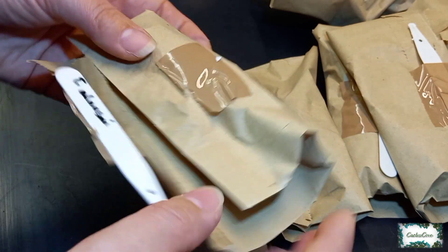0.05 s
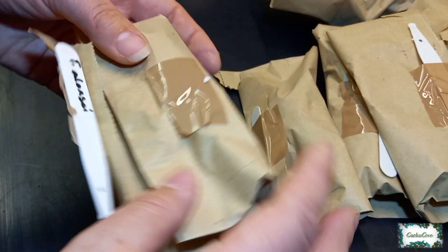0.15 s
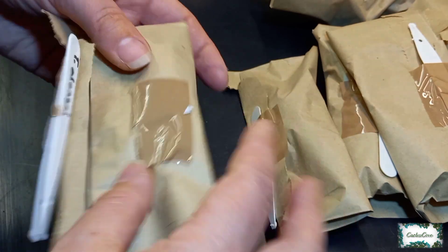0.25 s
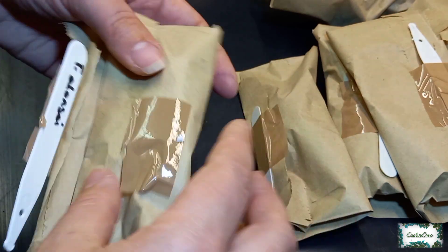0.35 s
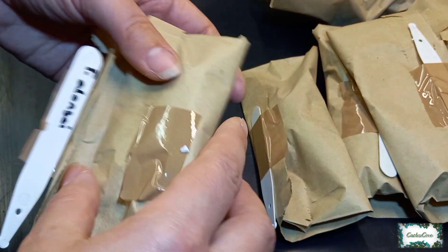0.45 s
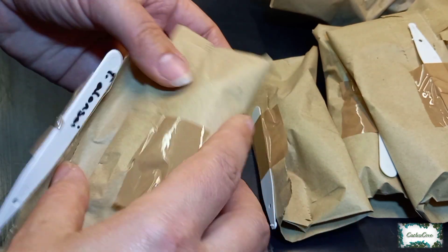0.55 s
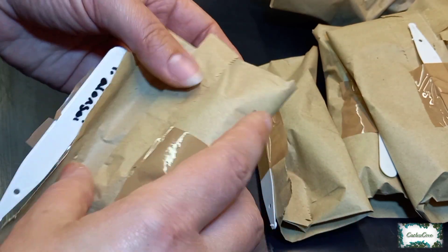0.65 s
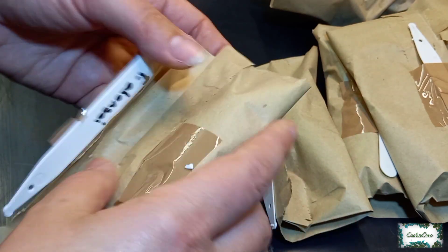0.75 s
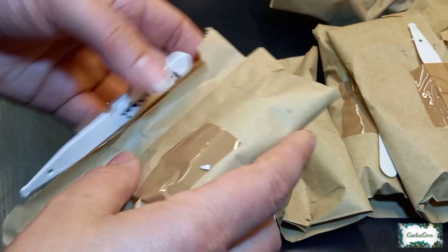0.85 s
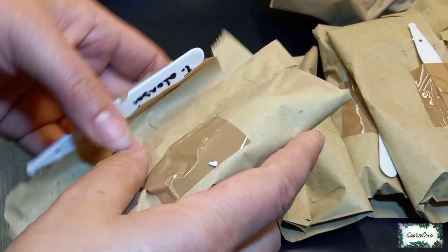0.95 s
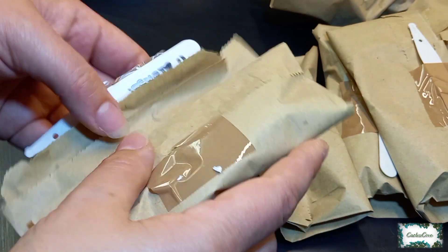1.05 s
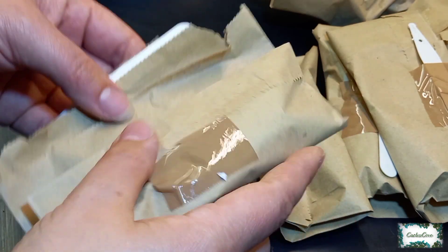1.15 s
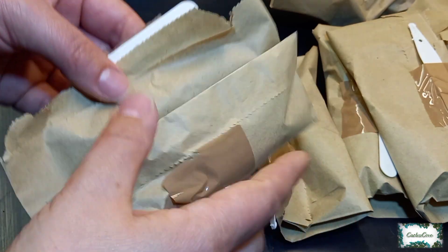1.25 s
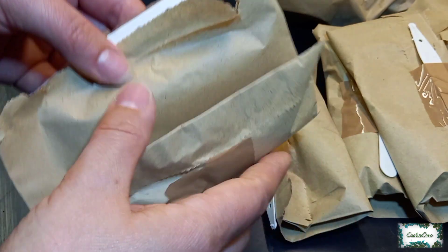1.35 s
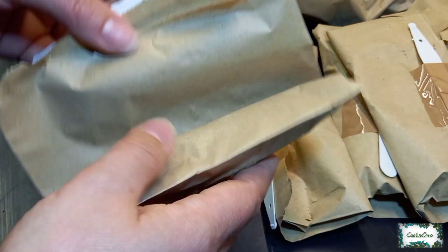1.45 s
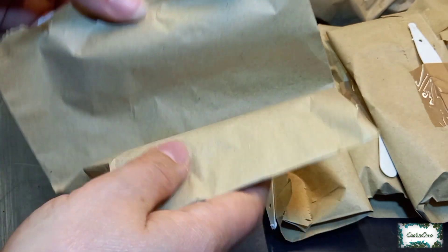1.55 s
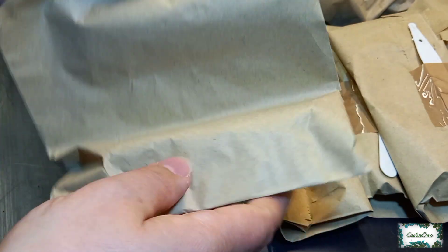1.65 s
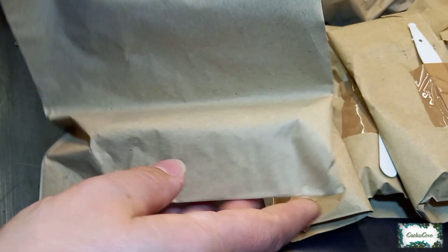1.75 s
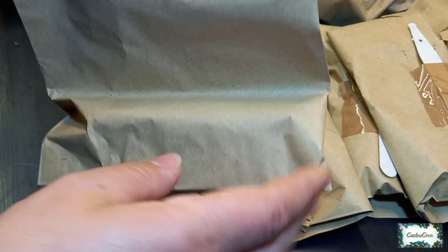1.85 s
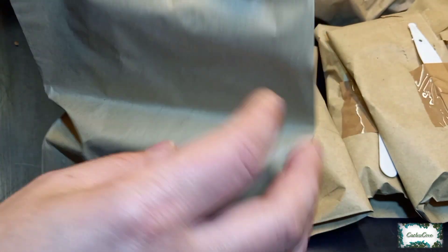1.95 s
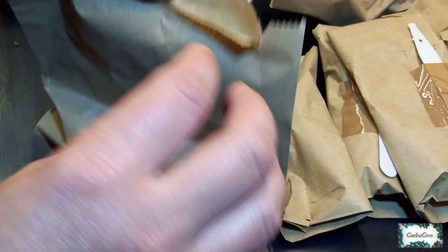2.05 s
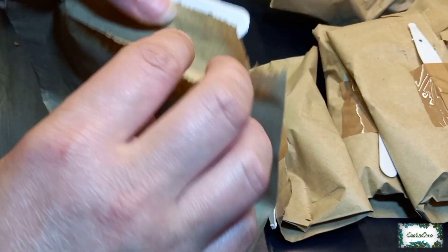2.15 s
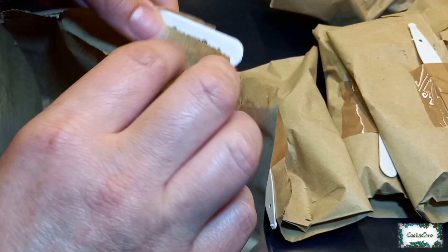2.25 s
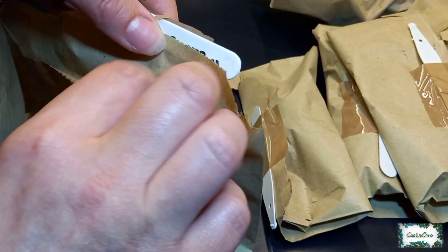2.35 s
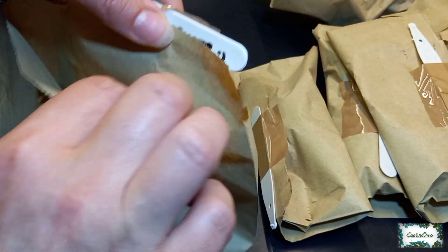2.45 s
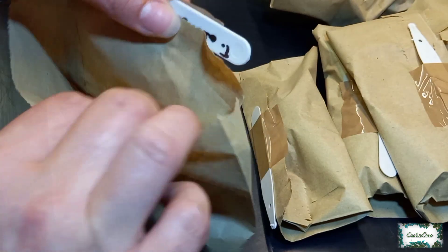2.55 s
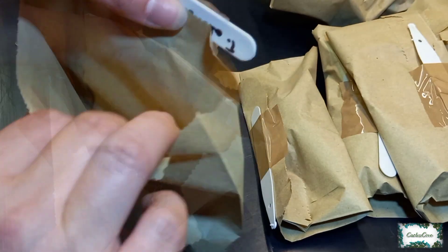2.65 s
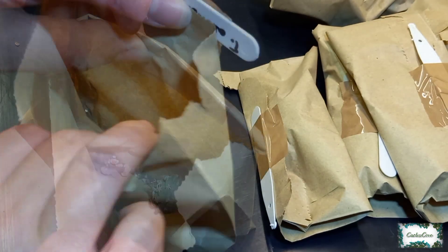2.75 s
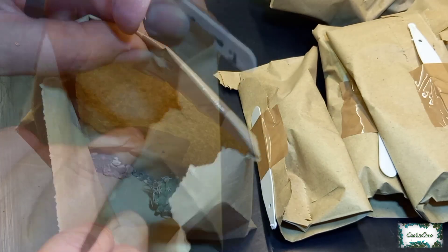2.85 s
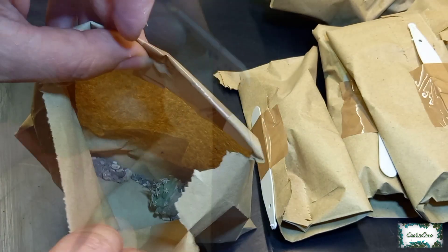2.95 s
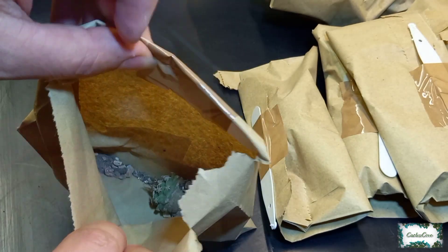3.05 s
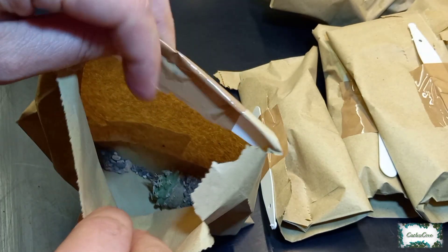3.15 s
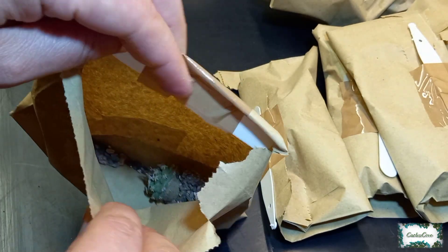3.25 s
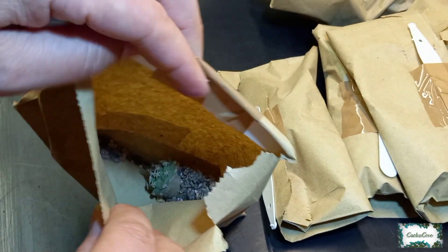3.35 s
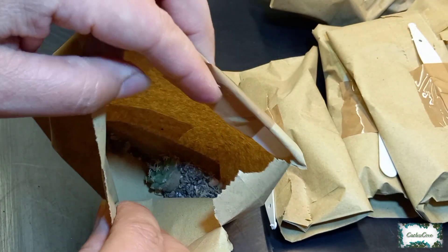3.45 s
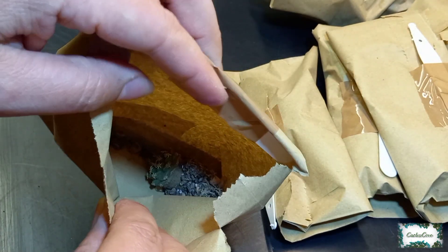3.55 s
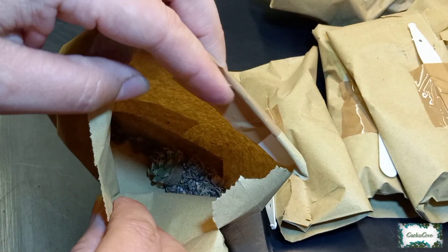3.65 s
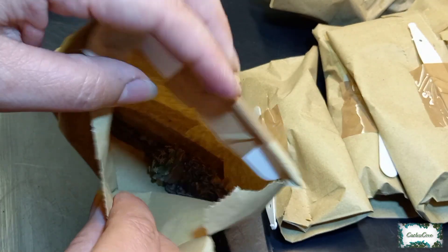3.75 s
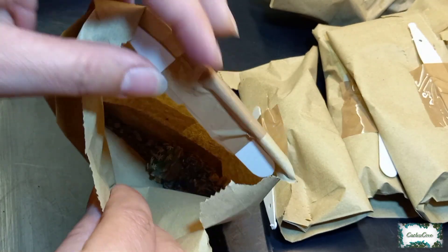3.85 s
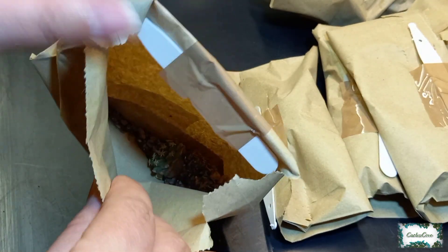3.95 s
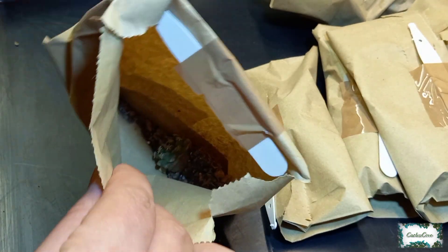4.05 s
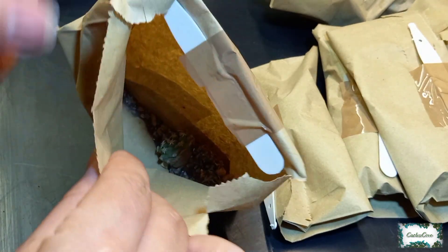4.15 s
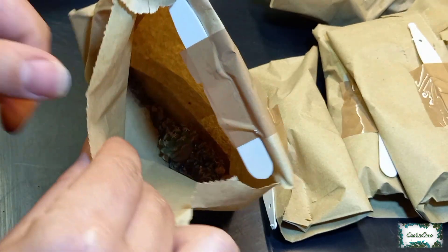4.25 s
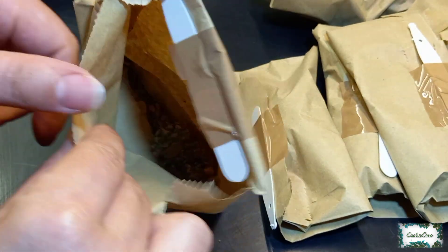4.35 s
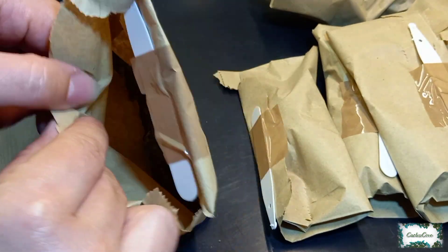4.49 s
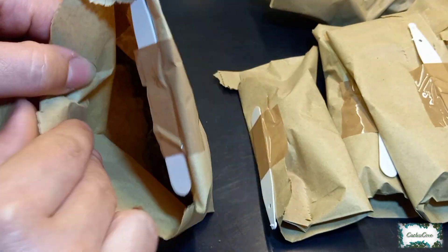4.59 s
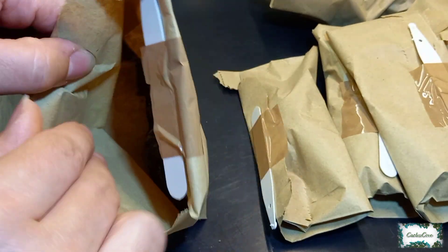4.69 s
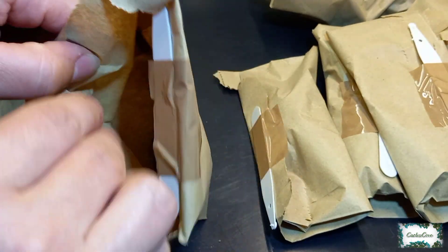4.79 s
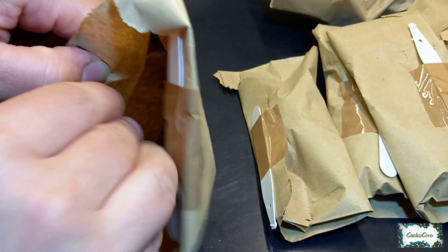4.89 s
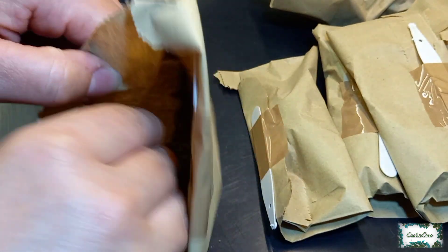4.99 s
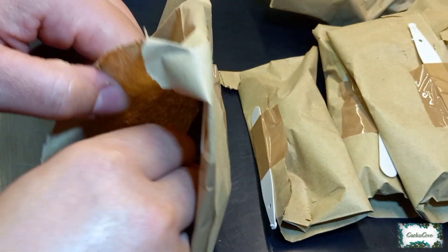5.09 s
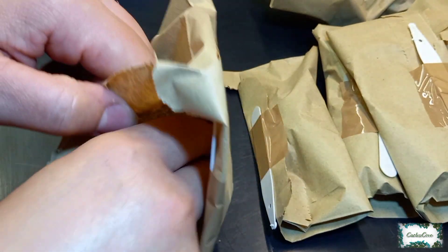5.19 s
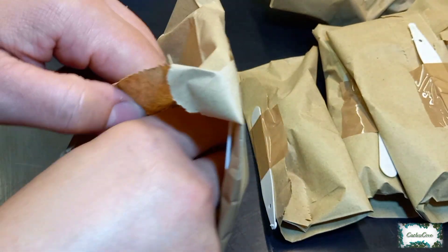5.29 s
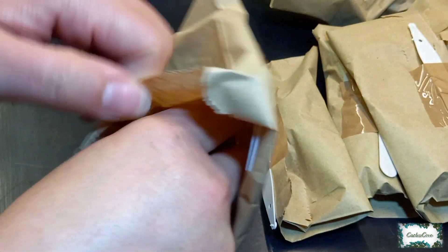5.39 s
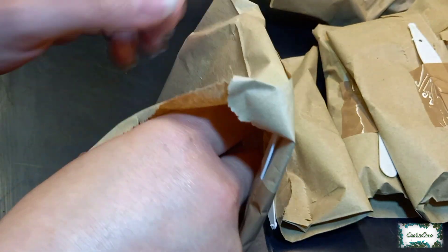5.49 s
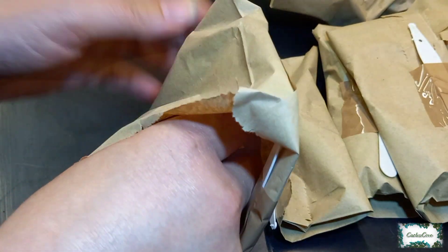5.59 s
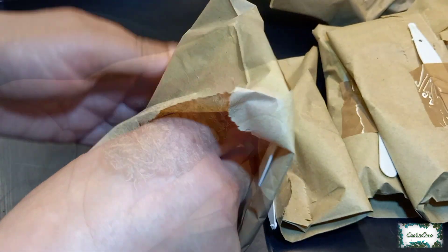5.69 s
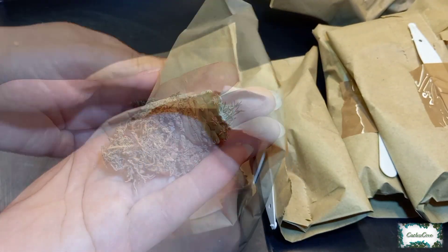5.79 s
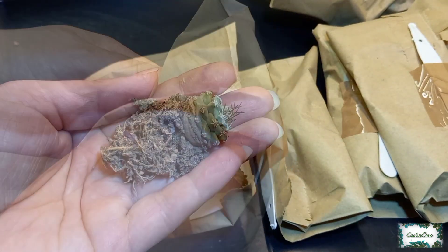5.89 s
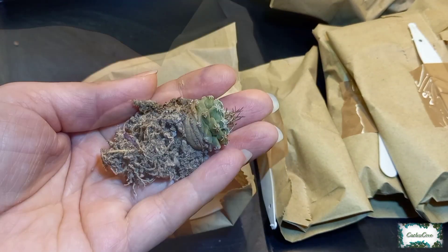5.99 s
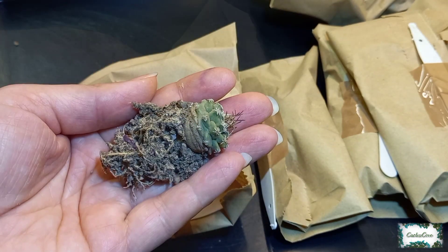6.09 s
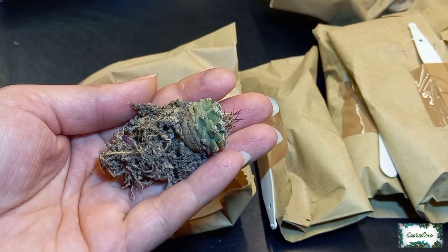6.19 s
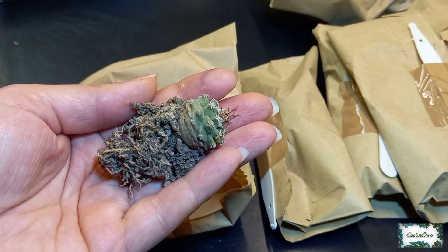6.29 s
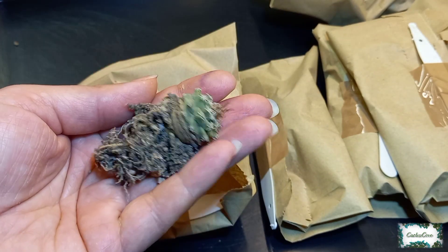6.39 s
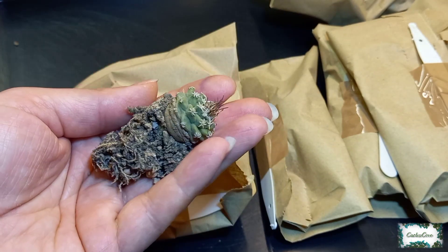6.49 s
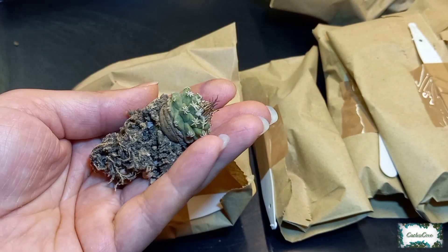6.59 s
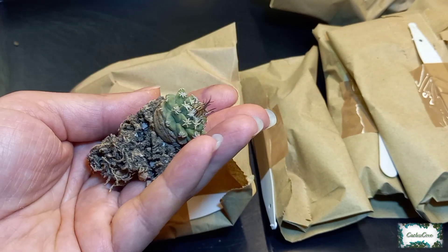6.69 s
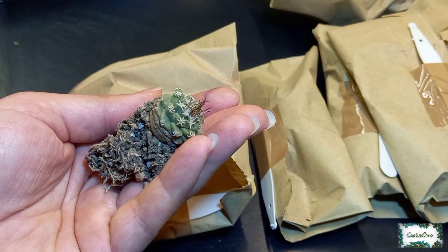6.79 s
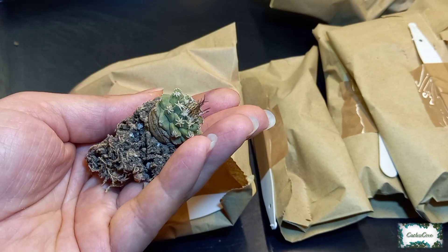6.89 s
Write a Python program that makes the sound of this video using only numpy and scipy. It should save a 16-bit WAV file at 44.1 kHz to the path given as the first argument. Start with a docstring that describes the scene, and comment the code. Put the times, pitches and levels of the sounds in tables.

```python
"""Handling a paper bag

Hands unfold a brown paper bag close by, pull it open, reach in and lift out a small cactus.
Creases buckle in swarms of tiny clicks and in single snaps, exciting the sheet and hollow of the bag.
Skin rubs narrow resonances, taut paper squeaks and the bag bumps softly; walls reflect the paper sound.
A quiet room adds noise, mains hum and a low drone that swells, fades and sinks within 1.4 s."""
import sys
import numpy as np
from scipy import signal
from scipy.fft import rfft, irfft
from scipy.io import wavfile
from scipy.ndimage import uniform_filter1d

SR = 44100
rng = np.random.default_rng(int(sys.argv[2]) if len(sys.argv) > 2 else 0)


def materialize(psi):
    """Save the field psi as 16-bit PCM at rate SR to the path in sys.argv[1].

    A 1-D psi becomes a single channel; in a 2-D psi each row is a channel.
    """
    bounded = np.clip(np.atleast_2d(psi).T, -1, 1)
    quanta = np.round(bounded * 32767).astype(np.int16)
    wavfile.write(sys.argv[1], SR, quanta)


N = 305613
TIME = np.arange(N) / SR
LEAD = 32  # samples by which every facet burst is delayed

# relative spectrum of the flexing sheet: frequency_hz, level_db
SHEET_COLOUR = [(800, -33.5), (1400, -6), (1800, -1.5), (2500, 0), (3200, -3.5), (4200, -4), (5200, -6.5),
                (8000, -29.5)]
# relative spectrum of the air in the bag: frequency_hz, level_db
HOLLOW_COLOUR = [(200, -19.5), (400, -13.5), (520, -6), (650, -1), (820, 0), (1030, 0.5), (1300, -5.5),
                 (1700, -8), (3000, -57)]
# relative spectrum of the bag's low rumble: frequency_hz, level_db
RUMBLE_COLOUR = [(35, -26), (70, 2.5), (130, -2), (250, -0.5), (370, -1.5), (550, -11.5), (1200, -54.5)]
# resonances of the bag: frequency_hz, width_hz, lift_db
BAG_MODES = [(533, 70, 8.5), (1050, 170, 7), (1647, 90, 5.5), (2150, 260, 0), (2600, 540, 1.5)]


def amp(db):
    """Level in decibels is twenty times the logarithm of amplitude."""
    return 10 ** (np.asarray(db) / 20)


def unit(x):
    """Normalization by root mean square gives unit mean power."""
    return x / np.sqrt(np.mean(x ** 2) + 1e-20)


def read(points, hz):
    """Linear interpolation along a logarithmic frequency axis."""
    f, value = np.transpose(points)
    return np.interp(np.log(hz + 1), np.log(f), value)


def add(mix, s, sound):
    """Superposition: adds a sound in place from time s, or from zero if s is negative."""
    part = mix[..., max(round(s * SR), 0):][..., :sound.shape[-1]]
    part += sound[..., :part.shape[-1]]


def through(x, taps):
    """Linear filtering is convolution with an impulse response."""
    return signal.oaconvolve(x, taps, axes=1)[:, :N]


def colour(spectrum, modes=(), size=4096):
    """Minimum phase: log magnitude fixes a causal response, here with resonances and unit energy."""
    hz = abs(np.fft.fftfreq(size, 1 / SR))
    db = read(spectrum, hz)
    for f, width, lift in modes:
        db = db + lift / (1 + (2 * (hz - f) / width) ** 2)
    response = np.exp(np.conj(signal.hilbert(np.log(amp(db)))))
    taps = np.fft.ifft(response).real[:size // 2]
    return taps[None] / np.linalg.norm(taps)


def partly_alike(first, second, same):
    """Coherence: mixes independent spectra at constant expected power, keeping a share of the first."""
    return same * first + np.sqrt(1 - same ** 2) * second


def background():
    """Stationary noise partly coherent between sides, with sinusoidal hum and a sinking drone."""
    # relative spectrum of room noise and hiss: frequency_hz, level_db (per Hz)
    floor_colour = [(20, -36.5), (45, 5), (110, 3.5), (250, -6), (500, -11), (1200, -20), (3000, -27),
                    (7300, -32.5), (7900, -25), (8250, -8.5), (8600, -24), (9500, -31), (16000, -27)]
    # coherence of the noise at the two ports: frequency_hz, likeness_0_to_1
    floor_likeness = [(25, .4), (60, .8), (300, 0.3), (1500, .2), (8000, 0.091)]
    # mains hum: frequency_hz, rms_level_db
    hum_tones = [(49.5, -86.5), (99.5, -84), (149, -88.5)]
    noise_rms_db = -74
    drone_hz, drone_sag_hz_per_s2 = 72.8, 6.55
    peak_s, peak_rms_db, slope_db_per_s = .11, -53, 59.5
    tail_rms_db, drone_end_s = -72.5, 1.4

    hz = np.fft.rfftfreq(N, 1 / SR)
    left, other = rfft(rng.standard_normal((2, N)))
    same = np.clip(read(floor_likeness, hz), 0, 1)
    right = partly_alike(left, other, same)
    noise = unit(irfft(np.array([left, right]) * amp(read(floor_colour, hz)), N))

    hum = sum(amp(db) * np.sin(2 * np.pi * (f * TIME + rng.random())) for f, db in hum_tones)

    swell = amp(peak_rms_db - slope_db_per_s * abs(TIME - peak_s))
    tail = amp(tail_rms_db) * np.sqrt(np.maximum(1 - (TIME / drone_end_s) ** 2, 0))
    pitch = drone_hz - drone_sag_hz_per_s2 * np.minimum(TIME, drone_end_s) ** 2
    drone = np.maximum(swell, tail) * np.sin(2 * np.pi * np.cumsum(pitch) / SR)
    # a sine's peak is sqrt(2) times its rms
    return amp(noise_rms_db) * noise + np.sqrt(2) * (hum + drone)


def handling():
    """Forcing envelopes: each stroke grips, swells or eases, then settles; stroke powers add."""
    # one push or pull of the hands; a negative start begins at zero, swell_db is the change over the
    # stroke, and the last two are relative to the crackle:
    # start_s, length_s, crackle_db, swell_db, sheet_db, hollow_db
    strokes = [(-0.008, 0.11, -63, 1, -12, -14.5), (0.123, 0.15, -70.5, -0.5, -1.5, -13),
               (0.322, 0.12, -64, 5, -9.5, -14), (0.416, 0.22, -60, -6.5, 1.5, -15.5),
               (0.548, 0.22, -54.5, 3, -1.5, -19), (0.782, 0.088, -57.5, 17, 1, -13.5),
               (1.002, 0.044, -67, 6, -2, -5.5), (1.077, 0.11, -51, 8.5, -2, -13),
               (1.244, 0.34, -52.5, 2, 0.5, -11), (1.468, 0.26, -46, -10, 1, -9.5),
               (1.701, 0.29, -52, 1.5, 1.5, -7.5), (2.022, 0.21, -49.5, -1.5, 0.5, -13),
               (2.247, 0.25, -55, 2, -2.5, -9.5), (2.439, 0.028, -44, 4, -2.5, -11),
               (2.535, 0.08, -47, 0, -2, -13.5), (2.624, 0.19, -49, 10, 0, -5),
               (2.857, 0.2, -47.5, -7.5, 0.5, -9), (3.086, 0.14, -53, 8.5, -1.5, -11),
               (3.239, 0.11, -49, -5, 4.5, -2.5), (3.404, 0.14, -55.5, 17, -8, -19),
               (3.568, 0.2, -56.5, 8.5, -1, -11), (3.75, 0.16, -48, 2.5, -2.5, -16.5),
               (4.01, 0.2, -73, 5, -6.5, -9.5), (4.192, 0.069, -59, -6, -5, -8.5),
               (4.264, 0.3, -64, 14, -10.5, -17), (4.465, 0.21, -48.5, 13, -3, -13.5),
               (4.64, 0.14, -56, 18, 0, -11), (4.91, 0.18, -72, 34, -10.5, -11.5),
               (5.077, 0.22, -45, 4, 0, -13), (5.325, 0.19, -43.5, -0.5, -0.5, -8),
               (5.59, 0.079, -60.5, 6, 2, -3.5), (5.68, 0.41, -62.5, 3, -5.5, -9.5),
               (5.934, 0.22, -57, 4, 0.5, -12.5), (6.15, 0.2, -67, -17, 1.5, -3.5)]
    grip_s, settle_db_per_s = .035, 181.5
    fade_start_s, fade_end_s = 6.32, 6.38  # the paper sound fades out quickly between these times

    power = np.zeros((3, N))
    for start, length, db, swell_db, sheet_db, hollow_db in strokes:
        t = np.arange(round(length * SR) + SR // 2) / SR
        swell = swell_db * (np.minimum(t / length, 1) - .5)
        settling = settle_db_per_s * np.maximum(t - length, 0)
        stroke = np.minimum(t / grip_s, 1) * amp(db + swell - settling)
        add(power, start, (amp([[0], [sheet_db], [hollow_db]]) * stroke) ** 2)
    return np.sqrt(power) * np.interp(TIME, [fade_start_s, fade_end_s], [1, 0])


def facet(decay_s, tick, lag_spread_s=.00005, patchy_db=3.5, far_ring_s=.003, size=2048):
    """Impulsive buckling: a tick and decaying noise of uneven colour, delayed and smeared at the right."""
    # coherence of paper sound at the two ports: frequency_hz, likeness_0_to_1
    port_likeness = [(100, 0.5), (300, 0.71), (700, 0), (1000, 0.3), (1350, 0.5), (2000, 0.54), (5000, 0),
                     (15000, 0.4)]
    # mean delay of paper sound at the right port: frequency_hz, lag_s
    port_lag = [(100, .00008), (400, 0.00013), (1020, 0.00013), (1280, 0.00029), (1700, .0003),
                (2600, .00017), (5000, 0.00017), (15000, .0002)]

    hz, t = np.fft.rfftfreq(size, 1 / SR), np.arange(size) / SR
    near, far, patches = rng.standard_normal((3, size))
    near = unit(near * np.exp(-t / decay_s))
    near = unit(near + tick * unit(t == 0))
    far = unit(far * np.exp(-t / (decay_s + far_ring_s)))

    same = np.clip(read(port_likeness, hz), 0, 1)
    lag = read(port_lag, hz) + lag_spread_s * rng.standard_normal()  # each facet has its own direction
    left = rfft(near)
    right = partly_alike(left, rfft(far), same) * np.exp(-2j * np.pi * hz * lag)

    patches = uniform_filter1d(uniform_filter1d(patches, size=50), size=40)
    patches = unit(patches)[:len(hz)]
    burst = irfft(np.array([left, right]) * amp(patchy_db * patches))
    burst = np.roll(burst, LEAD, axis=1)
    return burst / np.linalg.norm(burst, axis=1, keepdims=True)


def swarm(per_s, spread_db, decay_s, tick, rub, clump_db, steady_s=.04, count=30):
    """Random impulses, mostly small and strengthened in clumps, excite facets over sliding-paper hiss."""
    out = np.zeros((2, N))
    clumps = amp(clump_db * unit(uniform_filter1d(rng.standard_normal(N), size=450)))
    for _ in range(count):
        chance = rng.random(N)
        size = np.minimum(rng.exponential(1, N), 4.5)
        clicks = (chance < per_s / count / SR) * amp(spread_db * size)
        excitation = clumps * (unit(clicks) + rub * rng.standard_normal(N))
        out += through(excitation[None], facet(decay_s, tick))
    # the hands feed energy in steadily, so a large buckle relieves its neighbours
    power = uniform_filter1d((out ** 2).mean(0), round(steady_s * SR))
    return out / np.sqrt(abs(power) + 1e-9)


def bend(x, depth_db):
    """Time-varying resonance: bending lifts and lowers bands some 260 Hz wide for some 50 ms."""
    z = signal.stft(x, nperseg=512)[2]
    field = uniform_filter1d(rng.standard_normal(z.shape[1:]), size=3, axis=0)
    field = unit(uniform_filter1d(uniform_filter1d(field, size=8, axis=1), size=4, axis=1))
    return signal.istft(z * unit(amp(depth_db * field)), nperseg=512)[1][:, :N]


def rustle():
    """Source and filter: swarms of buckles excite the creases, the sheet and the hollow of the bag."""
    # relative spectrum of the creases: frequency_hz, level_db
    crease_colour = [(2500, -41), (4200, -3), (5000, 1.5), (6700, -1), (8000, 5), (9300, 1.5),
                     (11000, -1.5), (14000, 0.5), (15700, -4), (16400, -41)]
    # rumble as the bag is lifted or pressed on the table: time_s, relative_level_db
    contact = [(0, 1), (1.15, 0), (1.4, -8.5), (2.0, -3), (2.5, 1), (3.4, 1.5), (4.6, -4), (5.4, 2.5),
               (6.1, -3.5)]
    rumble_growth = 0.58  # the rumble follows the hollow, but grows by fewer dB

    crease, sheet, hollow = handling()
    rumble = hollow ** rumble_growth * amp(np.interp(TIME, *np.transpose(contact)))
    fine = swarm(per_s=900, spread_db=4.8, decay_s=.0005, tick=.45, rub=.68, clump_db=1.2)
    coarse = swarm(per_s=400, spread_db=4.8, decay_s=0.0028, tick=0.6, rub=0.42, clump_db=0.6)
    flexing = bend(unit(coarse + 0.68 * fine), depth_db=2.0)

    creases = through(fine * crease, colour(crease_colour))
    sheet_ring = through(flexing * sheet, colour(SHEET_COLOUR, BAG_MODES))
    hollow_ring = through(flexing * hollow, colour(HOLLOW_COLOUR, BAG_MODES))
    low_rumble = through(coarse * rumble, colour(RUMBLE_COLOUR))
    sides = np.array([[1], [-1]])  # left, right
    return (creases * amp(-1.0 + sides * 1)
            + sheet_ring * amp(-1.5 + sides * 1.1)
            + hollow_ring * amp(sides * -1.0)
            + low_rumble * amp(-35))


def room(x, wet_db=-7, gap_s=0.0037, size=16384):
    """Reverberation: sparse random reflections from table and walls decay at a rate set by frequency."""
    # reverberation time, for a decay of 60 dB: frequency_hz, t60_s
    ring_times = [(200, 0.43), (1000, 0.05), (4000, 0.15), (15000, 0.17)]

    arrivals = (rng.random((2, size)) < .15) * (np.arange(size) / SR > gap_s)
    taps = rng.standard_normal((2, size)) * arrivals
    hz, t, z = signal.stft(taps, SR, nperseg=256)
    decay = amp(-60 * t / read(ring_times, hz)[:, None])
    tail = signal.istft(z * decay, SR, nperseg=256)[1]
    tail /= np.linalg.norm(tail, axis=1, keepdims=True)
    return amp(wet_db) * through(x, tail)


def rubs():
    """Friction noise: skin sliding on paper excites one resonance of the sheet, swelling and fading."""
    # width is at half amplitude, level is the rms before the swell:
    # start_s, pitch_hz, width_hz, level_db, length_s
    rub_rows = [(0.126, 2150, 350, -68, .15), (1.45, 1050, 132, -56.5, 0.66), (1.5, 2400, 600, -54, 0.56),
                (2.658, 344, 220, -61, 0.34), (3.5, 2680, 129, -65.5, 0.28), (3.66, 2145, 130, -58, 0.24),
                (3.9, 2800, 400, -69.5, 0.21), (4.205, 1050, 250, -60.5, 0.058),
                (4.541, 1020, 300, -55, 0.3), (4.84, 1740, 300, -88, 0.12), (5.551, 1760, 380, -67.5, 0.61),
                (5.78, 534, 110, -59, 0.073)]

    out, hz = np.zeros((2, N)), np.fft.rfftfreq(SR, 1 / SR)
    for s, centre, width_hz, db, length in rub_rows:
        count = round(length * SR)
        resonance = 1 / (1 + (2 * (hz - centre) / width_hz) ** 2)
        noise = irfft(rfft(rng.standard_normal((2, SR))) * resonance)
        add(out, s, amp(db) * np.hanning(count) * unit(noise[:, :count]))
    return out


def snaps():
    """Snap-through instability: a crease cracks, the sheet rings near the facet's pitch, and air moves."""
    # large creases giving way; levels are relative, decay is the crack's at the left port,
    # left_right_db is the crack's left level over its right:
    # start_s, crack_db, sheet_db, decay_s, left_right_db, pitch_hz
    snap_rows = [(.1462, -46, -50, 0.0012, 5, 4500), (.2304, -62, -59.5, .0013, 4, 4000),
                 (.5595, -57, -55.5, .0026, 5, 1900), (.591, -60, -52.5, .003, 6, 2000),
                 (.6635, -37.5, -60, 0.0003, 8, 2500), (.7244, -46, -49, .0014, 1, 2800),
                 (.7439, -56, -44.5, 0.00075, 5, 1950), (0.8348, -49, -58, 0.0018, 6, 4770),
                 (0.8621, -49, -38, 0.0009, 2, 2980), (1.0096, -55.5, -65, .0005, 6.5, 2600),
                 (1.085, -50.5, -52.5, 0.0034, 11, 1800), (1.1252, -34, -36.5, .0035, 7, 4240),
                 (1.1713, -51, -46, .0014, 6, 3480), (1.3385, -48, -37, .0006, 3, 2600),
                 (1.3708, -56, -43.5, .003, -1, 2580), (1.4957, -42, -47, .004, 5, 3500),
                 (1.5128, -42, -39, .0012, -4, 1760), (1.5245, -43, -37.5, 0.0011, 13, 1700),
                 (1.5955, -58, -35.5, .001, -2, 2500), (1.648, -46, -39, .004, 5, 2200),
                 (1.69, -57, -40.5, 0.0041, -4, 2470), (1.7475, -49, -40, .003, 4, 2320),
                 (1.808, -53, -44, .003, 3, 2940), (1.841, -65, -42, 0.00081, 14, 3080),
                 (1.875, -66, -41, .003, 4, 2600), (1.918, -48, -44.5, .003, 6, 1790),
                 (1.974, -51, -49, .003, 7, 1800), (2.152, -45, -40, .001, 4, 1950),
                 (2.4594, -38.5, -51, .006, 4, 4900), (2.6757, -42, -50, 0.0012, 3.5, 2500),
                 (2.709, -36.5, -41.5, .004, 0, 1790), (2.728, -38.5, -49, .0013, 5, 4560),
                 (2.7713, -34.5, -45, .0024, 1, 1800), (2.782, -34.5, -50, .0015, 0, 1900),
                 (2.866, -36.5, -50, .002, 1, 1800), (2.875, -44, -60, 0.0018, 10, 1800),
                 (2.9004, -31, -56, .008, 3, 1700), (2.9095, -33.5, -35, .0046, 3, 3540),
                 (2.9674, -42.5, -43, 0.0067, 0, 1580), (2.997, -53, -45, .005, 1, 1700),
                 (3.1368, -36.5, -41, .0012, 6, 1700), (3.2296, -44, -45, .0006, 4, 1400),
                 (3.255, -36.5, -47.5, 0.0034, 2, 1600), (3.271, -56, -37, .003, 2, 1710),
                 (3.312, -38.5, -40, 0.0023, 3, 1590), (3.353, -37, -43, .0035, 3, 1940),
                 (3.538, -46.5, -51, .003, -15, 4400), (3.8014, -43.5, -63, 0.0013, 5, 1700),
                 (3.8816, -41.5, -43, .0034, -1, 4700), (3.8933, -38, -41, .002, 5, 1700),
                 (4.498, -47, -54.5, .0024, 2.5, 3540), (4.5345, -61, -44.5, .0035, 0.5, 1690),
                 (4.5663, -29.5, -42.5, .0013, 4, 4900), (4.588, -35.5, -40.5, 0.0021, 2.5, 1700),
                 (4.6395, -26.5, -32, .0013, 2.5, 1770), (4.66, -35.5, -44, .002, 4, 4500),
                 (4.7138, -40, -38, .0016, -11, 2400), (4.751, -36.5, -45, .001, 11.5, 3470),
                 (4.76, -29, -39.5, .0009, 5, 4800), (5.048, -55, -60, .003, 3, 1900),
                 (5.166, -35, -36, .003, -1, 2780), (5.187, -52, -37, 0.0031, -10, 1700),
                 (5.256, -36, -31.5, 0.0025, -5, 1860), (5.286, -37.5, -40.5, .001, 7, 3660),
                 (5.3, -42, -36.5, 0.0048, -2, 1410), (5.368, -42, -36, .0013, 0.5, 1780),
                 (5.4147, -39, -35, .004, -9, 1900), (5.4286, -35.5, -33.5, .002, 2, 1560),
                 (5.4474, -55, -36, .0013, 3, 1800), (5.981, -39.5, -41.5, 0.0008, 2, 4370),
                 (6.121, -54, -46, .0024, 2, 1810), (6.1927, -52, -53, .003, 3, 3600),
                 (6.25, -53, -52.5, .002, 3, 2530)]
    # relative spectrum of the crack: frequency_hz, level_db
    crack_colour = [(2500, -39), (4200, -3), (6500, -2), (8000, 2.5), (9300, 4.5), (11000, -1), (14000, 4),
                    (15700, -9.5), (17000, -22)]
    crack_gain_db, sheet_gain_db, hollow_gain_db, push_gain_db = 24.0, 23, 24, 10
    sheet_ring_s, hollow_ring_s = .0032, .0033  # added to the crack's decay
    tick, tick_s = .9, .0008
    pitch_width_hz, pitch_lift_db = 600, 8
    middling_s, hollow_re_sheet_db, hollow_db_per_doubling = .002, -11.5, 6

    out = np.zeros((2, N))
    crack = colour(crack_colour)
    hollow, push = colour(HOLLOW_COLOUR, BAG_MODES), colour(RUMBLE_COLOUR)
    for s, crack_level, sheet_level, decay_s, left_right_db, hz in snap_rows:
        sheet = colour(SHEET_COLOUR, [*BAG_MODES, (hz, pitch_width_hz, pitch_lift_db)])
        # a slow snap is a large facet and moves more air in the bag
        slowness = np.log2(decay_s / middling_s)
        hollow_level = sheet_level + hollow_re_sheet_db + hollow_db_per_doubling * slowness
        sharp = tick * tick_s / decay_s  # the quicker the snap, the more of its crack is one tick
        parts = [(crack, crack_gain_db + crack_level, 0, sharp, left_right_db),
                 (sheet, sheet_gain_db + sheet_level, sheet_ring_s, 0.31 * sharp, .6 * left_right_db),
                 (hollow, hollow_gain_db + hollow_level, hollow_ring_s, 0, 0),
                 (push, push_gain_db + hollow_level, hollow_ring_s, 0, 0)]
        for taps, db, ring_s, tick_share, left_db in parts:
            sound = through(facet(decay_s + ring_s, tick_share), taps)
            sound /= np.linalg.norm(sound, axis=1, keepdims=True)
            sides = unit(amp(np.array([[left_db], [0]])))
            add(out, s - LEAD / SR, amp(db) * sides * sound)
    return out


def short_tones(rows, waver):
    """Frequency modulation: swelling sines whose pitch wavers at random by an rms fraction."""
    out = np.zeros(N)
    for s, hz, db, length in rows:
        count = round(length * SR)
        wander = unit(uniform_filter1d(rng.standard_normal(SR), size=150))[:count]
        pitch = hz * (1 + waver * wander)
        add(out, s, amp(db) * np.hanning(count) * np.sin(2 * np.pi * np.cumsum(pitch) / SR))
    return out


def bumps():
    """Low-frequency vibration: the bag bumps softly as it is moved."""
    # start_s, pitch_hz, peak_level_db, length_s
    bump_rows = [(1.12, 127, -61, 0.051), (2.75, 191, -53.5, 0.042), (2.88, 174, -67, 0.072),
                 (3.70, 136, -64.5, 0.12), (4.80, 61, -61, .083), (4.99, 87.4, -54, .08),
                 (5.35, 86, -55, 0.14), (5.52, 126, -60, 0.061)]
    return short_tones(bump_rows, waver=.15)


def squeaks():
    """Frictional oscillation: a taut patch of paper squeaks faintly under the fingers."""
    # start_s, pitch_hz, peak_level_db, length_s
    squeak_rows = [(1.253, 1050, -55, .018), (1.5, 1030, -51, .018), (4.86, 913, -78, .14),
                   (4.915, 1880, -72, .1)]
    return short_tones(squeak_rows, waver=0.0089)


def scene():
    """Superposition of the direct paper sound, its reflections, the bumps and the background."""
    paper = rustle() + rubs() + snaps() + squeaks()
    return background() + paper + room(paper) + bumps()


def record(dry):
    """Band limitation: a linear-phase low-pass filter removes the highest treble."""
    edge_hz = 16600
    taps = signal.firwin(301, edge_hz, window=("kaiser", 8), fs=SR)
    return signal.oaconvolve(dry, taps[None], "same", axes=1)


dry = scene()
out = record(dry)
materialize(out)
```